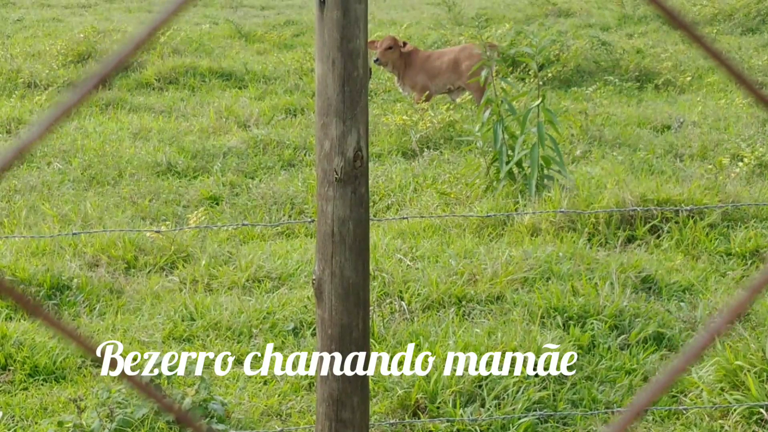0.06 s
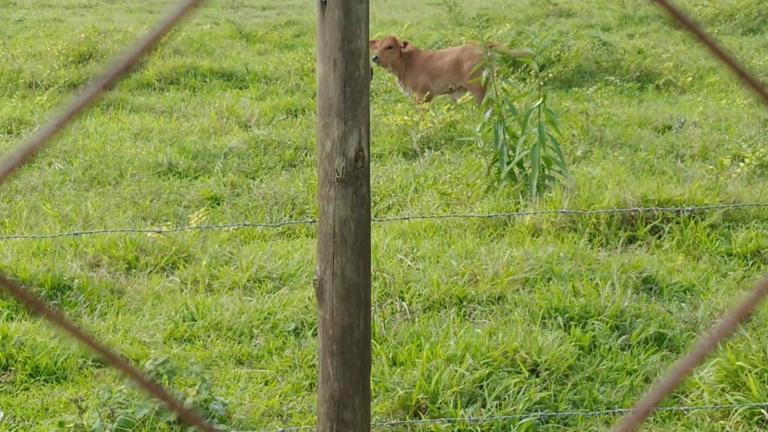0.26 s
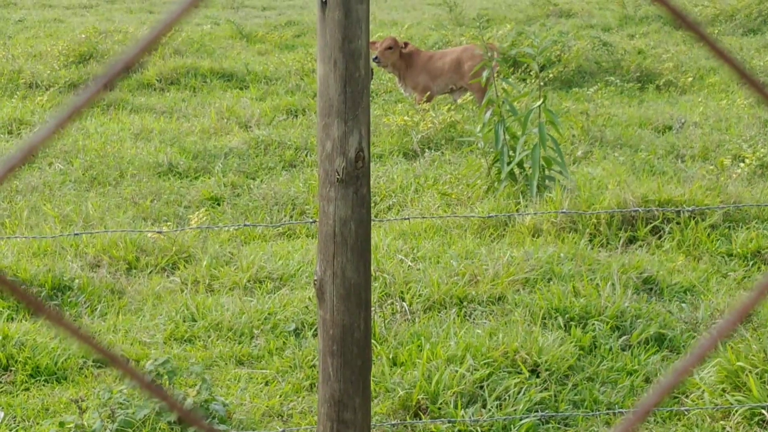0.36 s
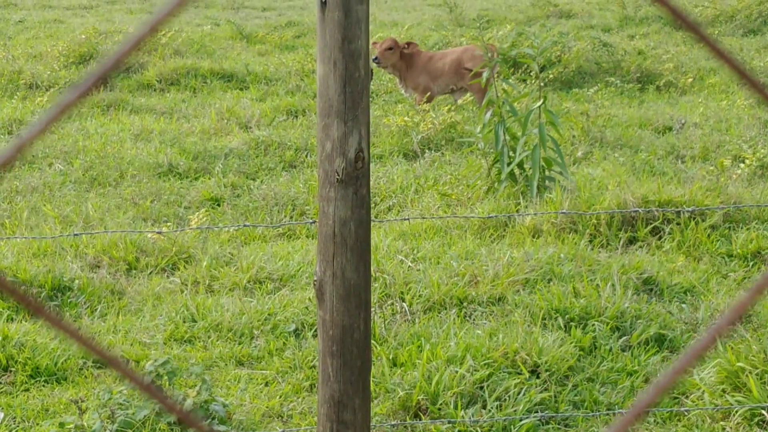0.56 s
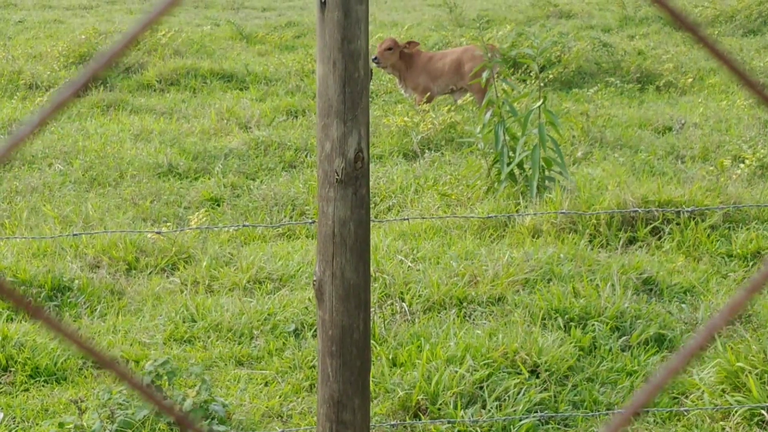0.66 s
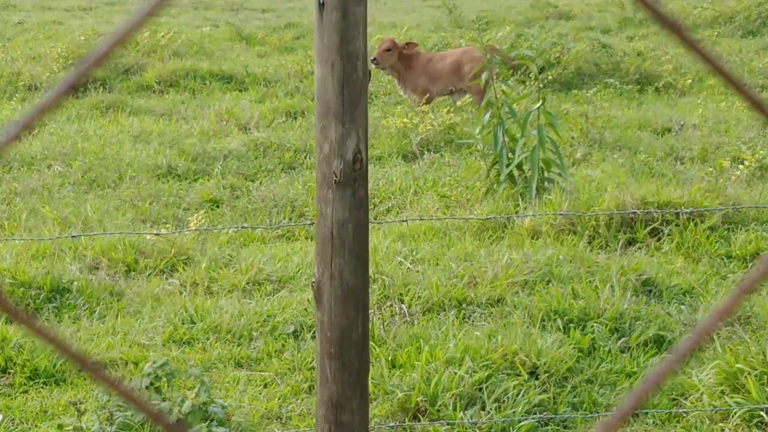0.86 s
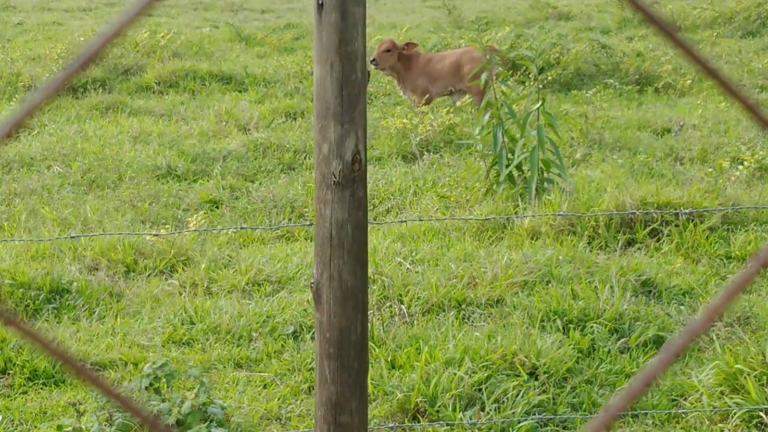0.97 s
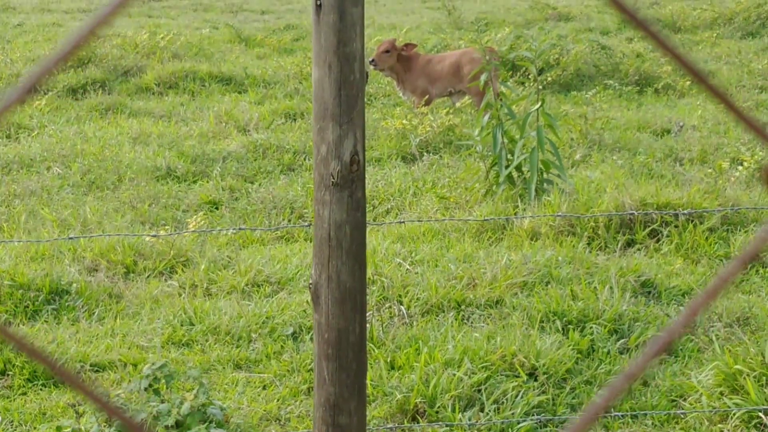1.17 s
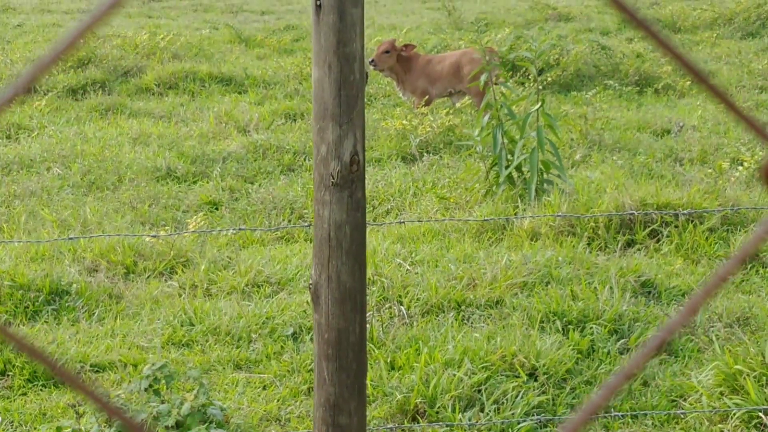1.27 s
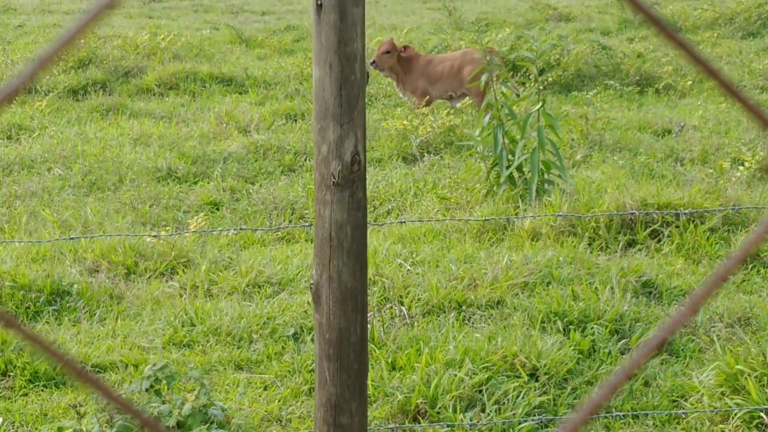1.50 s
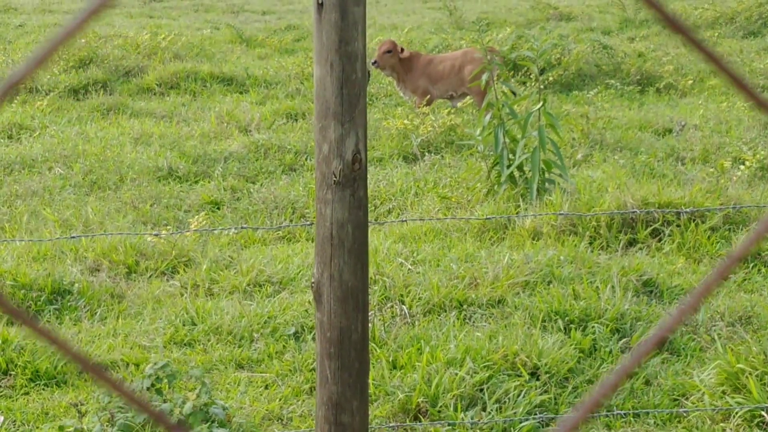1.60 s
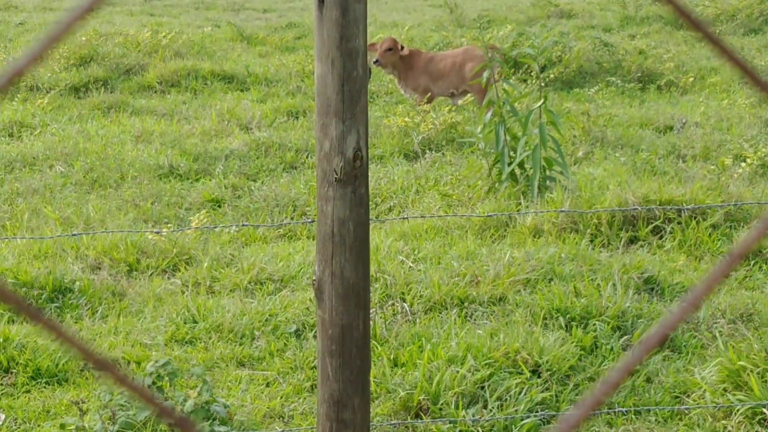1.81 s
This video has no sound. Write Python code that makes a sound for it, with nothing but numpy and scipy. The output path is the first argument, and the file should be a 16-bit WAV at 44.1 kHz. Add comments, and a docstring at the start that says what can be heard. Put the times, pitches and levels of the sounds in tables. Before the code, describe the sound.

One drawn-out moo from a young cow, ending in a rasp, over soft outdoor air.

```python
"""A calf moos in a pasture

A closed-mouth hum opens into one long, buzzing moo that sags in pitch and rasps at its end.
Each snap of the vocal folds rings the throat; the field scatters the call and a far edge echoes it.
Behind it are soft outdoor air, a distant engine, thin insects and a few tiny clicks."""
import sys
import numpy as np
from scipy import signal
from scipy.fft import rfft, irfft
from scipy.io import wavfile

SR = 44100
rng = np.random.default_rng(int(sys.argv[2]) if len(sys.argv) > 2 else 0)


def to_wav(sig):
    """Store sig (one row per channel, or 1-D mono) as 16-bit WAV at the path in sys.argv[1].

    Samples outside -1..1 are clipped; the rate is SR.
    """
    pcm = np.clip(np.atleast_2d(sig), -1, 1) * 32767
    pcm = np.round(pcm).astype(np.int16)
    wavfile.write(sys.argv[1], SR, pcm.T)  # frames by channels


N = 81585


def from_db(db):
    """Turn decibels into a gain to multiply by."""
    return 10 ** (np.asarray(db) / 20)


def at_time(rows, t, column=1):
    """Read a table at times t, giving one row for each time."""
    rows = np.array(rows)
    return np.interp(t, rows[:, 0], rows[:, column])[:, None]


def at_hz(rows, hz):
    """Read a table at frequencies hz, with octaves evenly spaced."""
    rows = np.array(rows)
    return np.interp(np.log(hz + 1), np.log(rows[:, 0]), rows[:, 1])


def pan(db):
    """Left and right gains that make the left side db louder."""
    return from_db(np.array([[.5], [-.5]]) * db)


def noise(gain, channels=2):
    """Noise shaped by a gain for each frequency, then scaled to strength 1."""
    x = irfft(rfft(rng.standard_normal((channels, N))) * gain, N)
    return x / x.std()


def band(hz, centre_hz, width_hz):
    """Gains that keep a narrow band of frequencies."""
    return 1 / (1 + (2 * (hz - centre_hz) / width_hz) ** 2)


# Tone of the air: f/Hz, relative level/dB
AIR_TONE = [(20, -24.5), (40, -22), (70, -7), (110, -5.5), (200, -10.5), (350, -14), (700, -11.5),
            (1100, -12), (1700, -26), (2300, -29), (3000, -17.5), (4300, -39), (6300, -37), (8000, -43.5),
            (11000, -48.5), (15500, -50)]
# How alike the two sides are: f/Hz, likeness (1 = the same)
AIR_LIKENESS = [(50, .7), (300, 0.28), (1000, 1), (2500, 0.37), (10000, .1)]
# Which side the air is louder on: f/Hz, left minus right/dB
AIR_BALANCE = [(50, -1.5), (200, -8.5), (800, -2.5), (6000, 5)]


def outdoor_air(hz):
    """A soft rush of air, partly shared by both ears and partly different."""
    alike = at_hz(AIR_LIKENESS, hz)
    shared, apart = noise(from_db(at_hz(AIR_TONE, hz)) * np.sqrt([1 + alike, 1 - alike]))
    stereo = np.array([shared + apart, shared - apart]) / np.sqrt(2)
    return from_db(-53) * irfft(rfft(stereo) * pan(at_hz(AIR_BALANCE, hz)), N)


# The engine's low notes: f/Hz, level/dB before panning
ENGINE_NOTES = [(72, -74.5), (108, -68.5), (143, -62.5), (181, -82)]


def engine(hz):
    """A distant engine drones to the right, each note a narrow band of noise."""
    notes = (from_db(db) * noise(band(hz, f, width_hz=15), channels=1) for f, db in ENGINE_NOTES)
    return sum(notes) * pan(-7.5)


def insects(hz):
    """Insects make a thin, high band of noise whose level flickers."""
    shrill = noise(band(hz, centre_hz=6630, width_hz=300))
    flicker_db = 1.5 * noise(band(hz, centre_hz=0, width_hz=36), channels=1)
    return from_db(-73 + flicker_db) * shrill


# Tiny clicks: t/s, relative level/dB, left minus right/dB
CLICKS = [(.2354, -47, 2), (.2633, -44, 6), (1.1612, -44, 6), (1.1995, -44, 6), (1.36, -43, 6)]


def clicks(decay_s=.0004):
    """Close, dry ticks, each a bright burst of noise that dies at once."""
    t, ticks = np.arange(N) / SR, np.zeros((2, N))
    for start, db, side_db in CLICKS:
        fade = (t >= start) * np.exp(-np.abs(t - start) / decay_s)
        ticks += pan(side_db) * from_db(db + 5) * rng.standard_normal(N) * fade
    return signal.sosfilt(signal.butter(1, [3000, 6000], "band", fs=SR, output="sos"), ticks + 1e-18)


def scatter(x, delay_s, fade_s, dull_hz):
    """Grass and trees return a late, dull blur of the sound that drops 60 dB in fade_s."""
    t = np.arange(N) / SR - delay_s
    tail = rng.standard_normal((2, N)) * (t > 0) * from_db(-60 * np.maximum(t, 0) / fade_s)
    tail /= np.linalg.norm(tail, axis=1, keepdims=True)
    dull = signal.sosfilt(signal.butter(2, dull_hz, fs=SR, output="sos"), x)
    return signal.fftconvolve(dull[None], tail, axes=1)[:, :N]


# Quick bounces of the call: delay t/s, level/dB, left minus right/dB
BOUNCES = [(.0038, -15, 5), (.0058, -17, -6), (.0112, -21, 6), (.0166, -22, -6)]


def bounces(x):
    """The ground and fence throw back the treble a few milliseconds late."""
    t = np.arange(N) / SR
    treble = signal.sosfilt(signal.butter(2, 1960, "high", fs=SR, output="sos"), x + 1e-18)
    return sum(pan(side_db) * from_db(db) * np.interp(t - delay, t, treble)
               for delay, db, side_db in BOUNCES)


# Which microphone hears the calf louder: f/Hz, left minus right/dB
PAIR_BALANCE = [(135, -3.5), (400, 3), (1200, .5), (1500, 6), (1660, 1), (1830, 23), (2050, 9),
                (2250, -1.5), (2500, -5.5), (2800, -7), (3050, -3.5), (3550, 12.5), (4100, -4.5), (4420, 2),
                (4700, -8.5), (5200, -3.5)]
# How far the left wave runs ahead of the right: f/Hz, phase/radians
PAIR_PHASE = [(135, .4), (400, 0), (1230, 0), (1400, .2), (1660, -.5), (1850, -1.9), (2330, -2.1),
              (2600, -1.3), (2800, -.9), (2950, .1), (3430, -.8), (3650, -1.5), (4000, -1.8), (4300, -2.6),
              (4550, -1.3), (6000, -1.4)]


def microphone_pair(x):
    """Two microphones hear each frequency with a different level and timing."""
    hz = np.arange(N + 1) * SR / (2 * N)
    gains = pan(at_hz(PAIR_BALANCE, hz))
    gains /= np.sqrt(np.mean(gains ** 2, axis=0))
    timing = np.exp(np.array([[.5j], [-.5j]]) * at_hz(PAIR_PHASE, hz))
    return irfft(rfft(x, 2 * N) * gains * timing)[:, :N]


# Loudness of the breath: t/s, level/dB
BREATH_LEVEL = [(.1, -92), (.2, -64.5), (.27, -58), (.45, -60.5), (.7, -61.5), (.95, -68), (1.28, -66),
                (1.34, -61), (1.41, -63), (1.46, -95)]
# Tone of the breath: f/Hz, relative level/dB
BREATH_TONE = [(2000, -31.5), (4500, -11), (5100, 8.5), (5500, 3.5), (6600, 0), (7700, -3.5), (8400, -13.5),
               (9900, -5.5), (11000, -23), (12000, -22), (16000, -28.5)]


def breath(hz):
    """Air leaving the calf's mouth hisses softly above the voice."""
    level_db = at_time(BREATH_LEVEL, np.arange(N) / SR)[:, 0]
    return noise(from_db(at_hz(BREATH_TONE, hz))) * from_db(level_db)


def voice_power(shape, db, pitch, hz):
    """Power at each frequency, scaled so the harmonics (multiples of the pitch) add up to db."""
    harmonics = pitch * np.arange(1, 50)
    total = np.sum(shape(harmonics) ** 2, axis=1, keepdims=True) * 2 * (pitch / SR) ** 2
    return (shape(hz) * from_db(db)) ** 2 / total


# Loudness of the hum: t/s, relative level/dB
HUM_LEVEL = [(.07, -54), (.088, -39.5), (.11, -36.5), (.122, -33.5), (.16, -34.5), (.19, -32.5),
             (.22, -33.5)]
# Tone of the hum: f/Hz, relative level/dB
HUM_TONE = [(50, -44), (110, -25.5), (225, -9), (340, -28), (460, -18), (580, -20), (800, -12), (950, -1.5),
            (1120, -6.5), (1270, 4), (1420, -8.5), (1700, -35), (2200, -29), (2700, -19.5), (2980, -6.5),
            (3400, -27), (3800, -19.5), (4150, -21.5), (4600, -45.5), (5200, -62.5), (9000, -61.5)]


def hum(t, pitch, hz):
    """With the mouth shut, the voice comes out through the nose."""
    return voice_power(lambda f: from_db(at_hz(HUM_TONE, f)), at_time(HUM_LEVEL, t) - 1.5, pitch, hz)


# Loudness of the chest sound: t/s, relative level/dB
CHEST_LEVEL = [(0.22, -65), (0.28, -41), (0.51, -57), (0.584, -41.5), (0.69, -40), (0.71, -42.5),
               (1.118, -42), (1.42, -41.5)]
# Tone of the chest sound: f/Hz, relative level/dB
CHEST_TONE = [(40, -42.5), (90, -21.5), (135, -7), (200, -4.5), (275, 1), (410, -2), (550, -9.5), (690, 5),
              (830, -12), (970, -2), (1300, -20), (2500, -35.5), (5000, -63)]


def chest(t, pitch, hz):
    """Weak low harmonics lie under the moo."""
    return voice_power(lambda f: from_db(at_hz(CHEST_TONE, f)), at_time(CHEST_LEVEL, t) - .5, pitch, hz)


# Loudness of the buzz: t/s, relative level/dB
BUZZ_LEVEL = [(.22, -40.5), (.272, -28), (.452, -27), (1.038, -27.5), (1.23, -28), (1.3, -30.5),
              (1.37, -29), (1.405, -29), (1.425, -34)]
# Tone of the buzz: f/Hz, relative level/dB
BUZZ_TONE = [(60, -48), (135, -13.5), (275, -15.5), (550, -17.5), (970, -31), (1300, 0.5), (1660, 1),
             (1800, 2), (1950, 0.5), (2100, 4), (2240, 10), (2380, -3.5), (2520, 3), (2650, -5.5),
             (2790, 5), (2930, -3.5), (3080, -1.5), (3280, 7), (3550, 0.5), (3750, 4.5), (3920, 3),
             (4130, -4.5), (4400, -10.5), (4650, -15.5), (5000, -27), (5300, -42.5), (7500, -52),
             (10000, -68), (12000, -73.5), (16000, -94)]


def buzz(t, pitch, hz, fade_db):
    """The vocal folds buzz brightly through the throat."""
    level_db = at_time(BUZZ_LEVEL, t) + 3 - fade_db
    return voice_power(lambda f: from_db(at_hz(BUZZ_TONE, f)), level_db, pitch, hz)


# The mouth's main ring: t/s, relative level/dB, f/Hz
MAIN_RING = [(0.22, -37.5, 1217), (0.302, -20, 1269), (0.376, -27.5, 1285), (0.426, -24.5, 1234),
             (0.49, -25, 1224), (0.58, -18.5, 1220), (0.676, -19.5, 1233), (0.71, -26.5, 1272),
             (1.018, -25, 1285), (1.208, -22.5, 1205), (1.402, -28.5, 1188), (1.42, -25, 1140)]
# Loudness of a narrow ring just below it, an upper ring and a low ring: t/s, relative level/dB
NARROW_LEVEL = [(.22, -34.5), (.32, -44), (.47, -50), (.55, -35.5), (.62, -33.5), (.69, -22.5), (.72, -24),
                (1.22, -29.5), (1.29, -35.5), (1.42, -28.5)]
UPPER_LEVEL = [(0.22, -42), (0.262, -27), (0.352, -24.5), (0.484, -26.5), (0.544, -32), (0.844, -24.5),
               (0.904, -30), (1.138, -30), (1.242, -34.5), (1.316, -42), (1.362, -33.5), (1.42, -35)]
LOW_LEVEL = [(0.22, -53.5), (0.256, -34), (0.312, -32.5), (0.396, -58.5), (0.42, -42), (0.456, -58.5),
             (0.54, -42), (1.064, -44), (1.338, -50.5), (1.376, -34), (1.42, -36.5)]
# Where the upper and low rings sit: t/s, f/Hz
UPPER_CENTRE = [(.22, 1564), (.33, 1610), (.47, 1625), (.6, 1580), (1.0, 1600), (1.42, 1600)]
LOW_CENTRE = [(.22, 384), (.35, 382), (.6, 398.5), (1.3, 433.5), (1.37, 518), (1.42, 450)]


def mouth(t, pitch, hz):
    """The open mouth rings at four frequencies (resonances), which give the moo its vowel."""
    def ring(centre_hz, db, width_hz, steep_hz):
        """One peak, falling off faster beyond steep_hz from its centre."""
        def shape(f):
            return np.sqrt(band(f, centre_hz, width_hz) / (1 + ((f - centre_hz) / steep_hz) ** 4))
        return voice_power(shape, db, pitch, hz)

    main = ring(at_time(MAIN_RING, t, column=2), at_time(MAIN_RING, t) + 2.5, width_hz=51.6, steep_hz=324)
    narrow = ring(1094.7, at_time(NARROW_LEVEL, t) - 2.5, width_hz=30, steep_hz=90)
    upper = ring(at_time(UPPER_CENTRE, t), at_time(UPPER_LEVEL, t) + .5, width_hz=81, steep_hz=356)
    low = ring(at_time(LOW_CENTRE, t), at_time(LOW_LEVEL, t) + .5, width_hz=31, steep_hz=199)
    return main + narrow + upper + low


def throat(t, pitch, hz, open_s=.215, opening_s=.01, release_s=1.41):
    """Gains that shape each pulse: the hum gives way to the open mouth, then the voice dies away."""
    ending_s = np.maximum(t - release_s, 0)[:, None]
    opened = np.clip((t[:, None] - open_s) / opening_s + .5, 0, 1) ** 2
    moo = mouth(t, pitch, hz) + chest(t, pitch, hz) + buzz(t, pitch, hz, fade_db=300 * ending_s)
    return np.sqrt((1 - opened) * hum(t, pitch, hz) + opened * moo) * from_db(-420 * ending_s)


def ring_after_strike(gain):
    """Time each frequency so the throat rings only after it is struck (minimum phase)."""
    cepstrum = irfft(np.log(gain + 1e-12))
    half = cepstrum.shape[-1] // 2
    cepstrum[:, 1:half] *= 2
    cepstrum[:, half + 1:] = 0
    return np.exp(rfft(cepstrum))


# How fast the vocal folds snap: t/s, f/Hz
PITCH = [(.065, 122), (.099, 125.6), (.117, 112.2), (.141, 113), (.175, 119.5), (.211, 124.4),
         (.321, 129.7), (.375, 133.3), (.41, 134.5), (.5, 136.1), (.57, 137.9), (.62, 138.7), (.665, 138.8),
         (.69, 139.6), (.77, 139.7), (.825, 138.9), (.9, 140.7), (.94, 139.7), (1.0, 140.1), (1.07, 139.3),
         (1.105, 139.2), (1.14, 138.6), (1.185, 137.5), (1.24, 137.2), (1.297, 134.5), (1.351, 130.9),
         (1.391, 120.8), (1.421, 104.6), (1.445, 94.7)]
# Strength of each puff of air next to its snap: t/s, level/dB
RASP = [(.07, -13.5), (.2, -14.5), (.3, -14.5), (.36, -24.5), (.6, -26), (.66, -28.5), (.69, -21.5),
        (.73, -27.5), (.85, -27), (.905, -18.5), (.97, -23), (1.08, -24), (1.15, -17), (1.24, -21),
        (1.32, -12.5), (1.44, -11.5)]


def calf(start_s=.065, stop_s=1.445, puff_s=.0035, size=4096):
    """Each cycle of the vocal folds sends one snap and one puff of air ringing through the throat."""
    t = np.arange(int(start_s * SR), int(stop_s * SR)) / SR
    cycles = np.cumsum(at_time(PITCH, t)) / SR
    snap_times = np.interp(np.arange(int(cycles[-1]) + 1), cycles, t)
    hz = np.arange(size // 2 + 1) * SR / size
    rasp = from_db(at_time(RASP, snap_times))
    chance = rng.standard_normal((len(snap_times), size))
    # More rasp also makes the snaps less even in timing and strength.
    starts = (snap_times + .0001 * rasp[:, 0] * chance[:, -1]) * SR
    snaps = from_db(1.5 * rasp * chance[:, -2, None])
    puff_fade = np.exp(-np.arange(size) / SR / puff_s)
    puffs = rasp * rfft(chance * puff_fade / np.linalg.norm(puff_fade))
    between_samples = np.exp(-2j * np.pi * hz / SR * (starts % 1)[:, None])
    ringing = ring_after_strike(throat(snap_times, at_time(PITCH, snap_times), hz))
    pulses = irfft((snaps + puffs) * between_samples * ringing)
    voice = np.zeros(N + size)
    for start, pulse in zip(starts.astype(int), pulses):
        voice[start:start + size] += pulse
    return voice[:N]


def scene():
    """The call, its bounces and echoes, and the pasture around it."""
    hz = np.arange(N // 2 + 1) * SR / N
    moo = calf()
    early = bounces(moo)
    field = from_db(-18) * scatter(moo, delay_s=.0044, fade_s=.28, dull_hz=4500)
    leaves = from_db(-5) * scatter(early.mean(axis=0), delay_s=.015, fade_s=.38, dull_hz=3400)
    far_echo = from_db(-35) * scatter(moo, delay_s=.46, fade_s=1, dull_hz=3540)
    call = microphone_pair(moo) + breath(hz) + early + field + leaves + far_echo
    return call + outdoor_air(hz) + engine(hz) + insects(hz) + clicks()


def record(dry):
    """Cut the highest treble steeply: 70 dB down from 16500 Hz up."""
    return signal.sosfilt(signal.cheby2(14, 70, 16500, fs=SR, output="sos"), dry)


dry = scene()
out = record(dry)
to_wav(out)
```